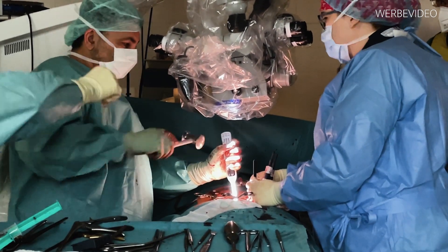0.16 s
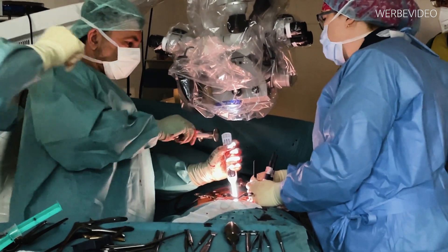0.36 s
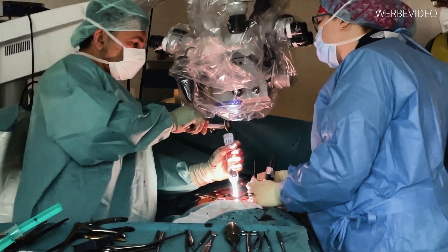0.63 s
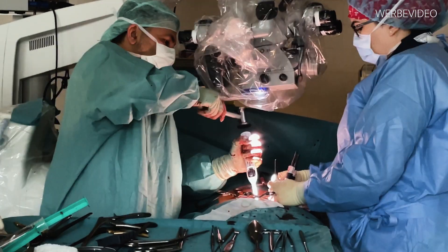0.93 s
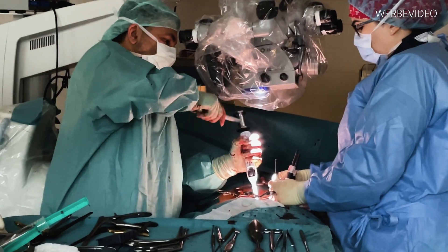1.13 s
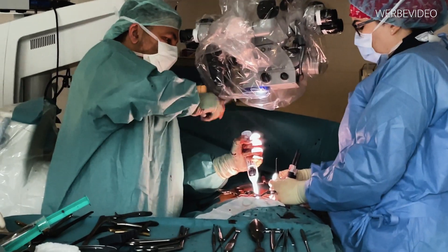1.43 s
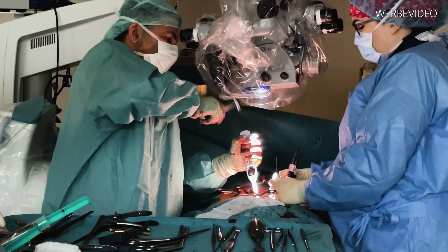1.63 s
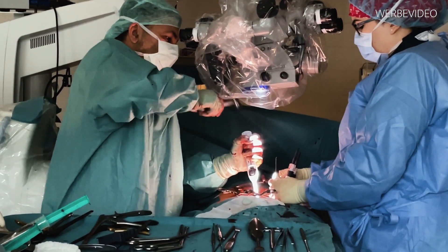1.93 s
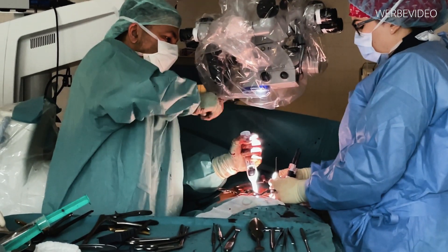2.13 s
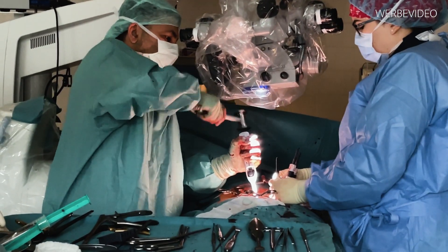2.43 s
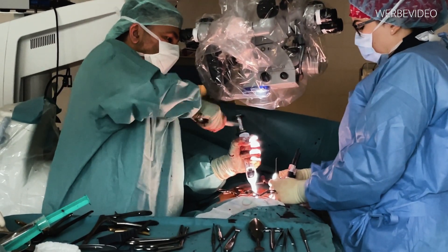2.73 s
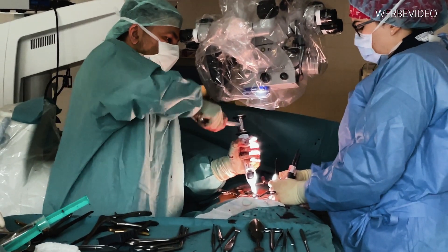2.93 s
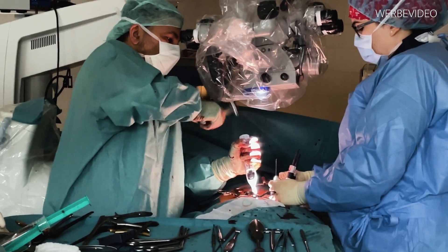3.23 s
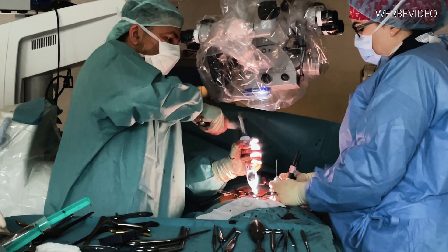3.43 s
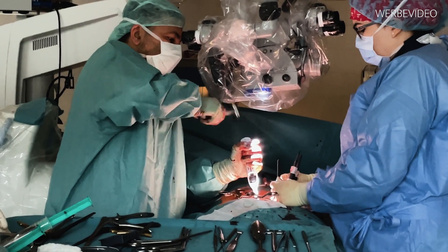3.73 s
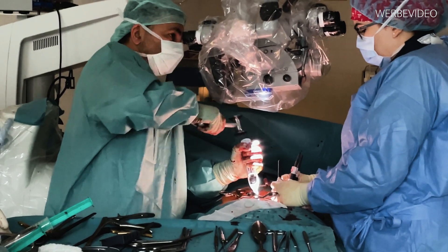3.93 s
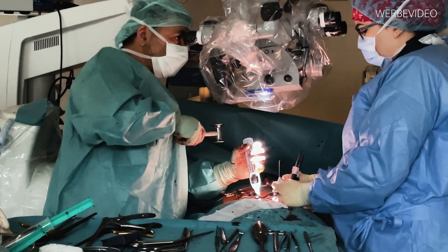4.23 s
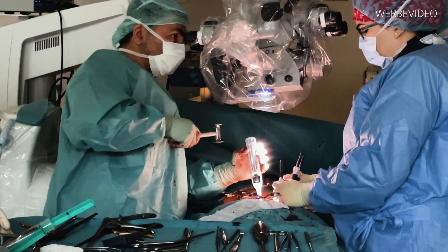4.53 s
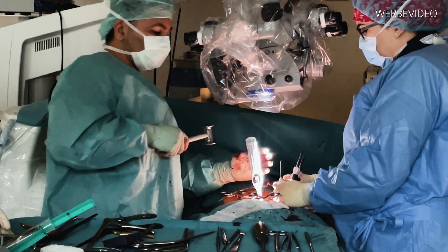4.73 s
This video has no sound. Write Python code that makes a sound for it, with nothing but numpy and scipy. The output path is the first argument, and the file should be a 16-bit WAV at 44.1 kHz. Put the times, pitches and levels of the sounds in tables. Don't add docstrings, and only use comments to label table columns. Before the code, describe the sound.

In a tiled operating room, soft suction hiss lies over low ventilation rumble, with a few tiny tool clicks. The hiss cuts off, and a steel mallet strikes a gripped metal instrument sixteen times in a quick even series. Each blow is a sharp crack with short damped ringing and a faint thud, answered by hard echoes. The microphone is about two metres away; afterwards only ventilation remains.

```python
import sys
import numpy as np
from scipy import signal
from scipy.fft import rfft, irfft
from scipy.io import wavfile
from scipy.ndimage import uniform_filter1d

SR = 44100
rng = np.random.default_rng(int(sys.argv[2]) if len(sys.argv) > 2 else 0)


def boost(x):
    u = np.asarray(x, float) / 20
    return 10 ** u


def int16_out(signal):
    q = np.round(np.clip(np.atleast_2d(signal).T, -1, 1) * 32767)
    wavfile.write(sys.argv[1], SR, q.astype(np.int16))


N = 214673


def shade(x, points):
    hz, db = np.transpose(points)
    f = np.arange(len(x) // 2 + 1) * SR / len(x) + 1
    gain = boost(np.interp(np.log(f), np.log(hz), db))
    return irfft(rfft(x) * gain, len(x))


def level(x, db):
    return x * boost(db) / np.sqrt(np.mean(x ** 2))


def fade(t, t60):
    return np.exp(-np.log(1000) * t / max(t60, 1e-3))


def rings(modes, db=0.):
    t = np.arange(SR // 4) / SR
    total = sum(boost(g) * np.sin(2 * np.pi * hz * t) * fade(t, t60) for hz, g, t60 in modes)
    return boost(db) * total


def add(out, sound, s):
    i = int(s * SR)
    out[i:i + len(sound)] += sound[:N - i]


def walk(rate):
    hold = int(SR / rate)
    steps = np.repeat(rng.standard_normal(N // hold + 1), hold)
    smooth = uniform_filter1d(uniform_filter1d(steps, hold), hold)
    return 0.71 * smooth[:N]


CENTRES_HZ = 30 * 2 ** np.arange(0, 9.5, .5)


def bands(x):
    f = np.arange(len(x) // 2 + 1) * SR / len(x) + 1
    place = 2 * np.log2(f / CENTRES_HZ[0])
    spectrum = rfft(x)
    return [irfft(spectrum * np.clip(1 - abs(place - k), 0, 1), len(x)) for k in range(len(CENTRES_HZ))]


# (time [s], crack peak [dB], landing spot, shaft partials [dB],
# lower head ring [dB], upper head ring [dB])
BLOWS = [(1.128, -3, "rim", -21, -21, -35.5), (1.3101, -6.5, "rim", -28, -18.5, -23),
         (1.4959, -9.5, "low", -23, -19.5, -25), (1.6798, -10, "low", -28, -20.5, -26.5),
         (1.8569, -5, "low", -20.5, -20, -21.5), (2.039, -5.5, "centre", -21.5, -25.5, -25),
         (2.2154, -8, "centre", -21.5, -26.5, -21.5), (2.4023, -6.5, "centre", -28.5, -23.5, -22.5),
         (2.5817, -7, "low", -19, -22, -23.5), (2.7534, -6.5, "centre", -20, -23.5, -21),
         (2.9274, -6, "centre", -23.5, -22.5, -25), (3.1027, -8, "far", -27, -26, -27.5),
         (3.2788, -6.5, "far", -21, -39, -23.5), (3.4587, -7, "side", -25, -32, -22.5),
         (3.6484, -6.5, "side", -21, -43.5, -21.5), (3.8486, -6, "side", -19, -42, -25)]
# (frequency [Hz], level [dB])
CRACK = [(300, -23.5), (600, -27.5), (1500, -13), (2300, -7.5), (2900, -5.5), (3600, -1.5), (5000, -1.5),
         (6500, 1.5), (8000, 0), (10200, -3.5), (12000, 2.5), (13200, -15.5), (15600, -15)]
# (frequency [Hz], level [dB])
BEAM = [(1000, 14.5), (3000, 1), (6300, 2), (8000, 5), (11000, -3.5), (15000, 6.5)]
ROOM_DB, ROOM_FOLLOWS = -5, 0.59
RING_START_HZ, RING_END_HZ, RING_RISE_S = 8770, 9260, 0.36


def head():
    out = np.zeros((3, N))
    t = np.arange(SR // 4) / SR
    habit = rng.standard_normal(len(t))
    burst = (t / .0008) ** 2 / (1 + (t / 0.001) ** 2) * fade(t, 0.0081)
    click = np.roll(shade(1. * (t == 0), CRACK), 60)[:200]
    for s, db, _, _, low_db, up_db in BLOWS:
        age = s - BLOWS[0][0]
        ring_hz = RING_END_HZ - (RING_END_HZ - RING_START_HZ) * np.exp(-age / RING_RISE_S)
        room_db = ROOM_DB + ROOM_FOLLOWS * (db + 5)
        crack = shade(.5 * habit + .85 * rng.standard_normal(len(t)), CRACK)
        crack = shade(crack, BEAM) * burst
        ring = rings([(ring_hz, low_db + 7, .009), (12190, up_db, .03),
                      (12300, up_db + 3, .014), (14150, up_db - 19, .04)])
        aim = 0.72 * rng.standard_normal()
        add(out[0], boost(db) * crack / (32 * crack.std()) + ring, s + .0007)
        add(out[1], boost(room_db - db) * ring, s + .0005)
        add(out[1], boost(room_db + 10.5) * np.cos(aim) * click, s)
        add(out[2], boost(room_db + 12.5) * np.sin(aim) * click, s)
    return out


SEATED_S, SEATING_S = 3.17, .07


def seated(s):
    return 1 / (1 + np.exp((SEATED_S - s) / SEATING_S))


# (frequency [Hz], level [dB], t60 [s])
KNOCK = [(870, -17.5, 0.041), (967, -3.5, 0.022), (928, -3.5, 0.021), (1000.6, -4, 0.04),
         (1040, -2.5, 0.011), (1776, -5, 0.036)]
# (frequency [Hz], level [dB], t60 [s])
THUD = [(174.5, 1, 0.12), (320, -12.5, 0.018), (500, -10.5, 0.012)]
# (clack [Hz], clack [dB], partial [Hz], second partial [Hz],
# second partial against the first [dB])
SPOTS = dict(rim=(1860, -25.5, 2200, 4100, -3), side=(1760, -24, 2485, 4500, -5),
         low=(1340, -24.5, 2475, 4570, -2), centre=(1440, -19.5, 2795, 3250, -4),
         far=(1850, -27.5, 2170, 3170, -1))
KNOCK_DB, KNOCK_SAG_DB_PER_S = -23, -2.5
THUD_DB, THUD_CHOKE_DB = -36, -9
CLACK_ROOM_DB = -10.5
PARTIAL_T60_S, GRIP_DETUNE, GRIP_DB = .011, .008, 1.5


def shaft():
    out = np.zeros((2, N))
    grips = rng.standard_normal((len(BLOWS), 2, len(KNOCK)))
    for (s, _, spot, up_db, *_), (detune, weight) in zip(BLOWS, grips):
        clack_hz, clack_db, hz, hz2, db2 = SPOTS[spot]
        knock_db = KNOCK_DB + KNOCK_SAG_DB_PER_S * (s - BLOWS[0][0])
        held = [(f * (1 + GRIP_DETUNE * a), g + GRIP_DB * b, d)
                for (f, g, d), a, b in zip(KNOCK, detune, weight)]
        knock = rings(held, knock_db - 7)
        partials = rings([(hz, 0, PARTIAL_T60_S), (hz2, db2, PARTIAL_T60_S)], up_db - 6)
        clack = rings([(clack_hz, clack_db, .012)])
        thud = rings(THUD, THUD_DB + THUD_CHOKE_DB * seated(s))
        for way, clack_gain in zip(out, (1, boost(CLACK_ROOM_DB))):
            add(way, knock + partials + clack_gain * clack, s + .0012)
            add(way, thud, s + 0.0028)
    return out


# (time [s], level [dB], frequency [Hz], t60 [s])
CLICKS = [
    (0.284, -48, 3450, 0.012),
    (0.312, -47, 3250, 0.012),
    (.403, -43, 3300, 0.0073),
    (0.4174, -35.5, 1710, 0.0057),
    (0.4182, -28.5, 2070, 0.008),
    (0.4207, -47, 5800, 0.0055),
    (0.977, -57.5, 3300, 0.023),
    (4.335, -54, 3400, 0.015),
    (4.655, -60, 3300, .02),
]


def tools():
    out = np.zeros(N)
    for s, db, hz, t60 in CLICKS:
        add(out, rings([(hz, db, t60)]), s)
    return out


# (delay [ms], level [dB], dullness [0-1])
ECHOES = [(2.117, -10, 0), (4.49, -13, 0), (7.51, -6, 0.2), (18.07, -9.5, 0.2), (23.77, -13, 0.8),
          (37.8, -9, 1)]


def echoes():
    response = np.zeros(SR // 10)
    response[0] = 1
    for ms, db, dull in ECHOES:
        dull = np.clip(dull, 0, .95)
        add(response, boost(db) * (1 - dull) * dull ** np.arange(200), ms / 1000)
    return response


# (frequency [Hz], t60 [s], level [dB])
TAIL = [(120, 0.82, -13.5), (301.4, 0.6, -15), (602, 0.86, -16), (990, 0.57, -10), (2130, 0.61, -9),
        (3900, 0.54, -11.5), (7900, 0.42, -11), (12530, 0.23, -8.5), (13600, 0.27, -14), (15500, 0.26, -13)]


def room():
    t = np.arange(SR) / SR
    hz, t60, db = np.transpose(TAIL)
    t60 = np.interp(np.log(CENTRES_HZ), np.log(hz), t60)
    db = np.interp(np.log(CENTRES_HZ), np.log(hz), db)
    parts = bands(rng.standard_normal(SR))
    tail = sum(boost(g - 15.0) * part * fade(t, d) for part, d, g in zip(parts, t60, db))
    return tail * (1 - np.exp(-(t / 0.0091) ** 2))


# (frequency [Hz], level [dB per Hz])
AIR = [(30, -39), (60, -4), (100, -2), (160, -4.5), (256, -15), (405, -18), (575, -24.5), (720, -17.5),
       (990, -27), (1900, -31.5), (3400, -36.5), (4500, -38.5), (12500, -47), (14500, -62)]
# (frequency [Hz], level [dB per Hz])
HISS = [(600, 10), (1500, -3.5), (3300, -2.5), (5000, -12), (7800, -9.5), (10000, -13.5), (12500, -13),
        (15000, -22)]
AIR_DB = -49
SUCTION_DB, SUCTION_SWELL_DB, SUCTION_SWELL_S, SUCTION_SWELL_WIDTH_S = -58, 2, 0.49, 0.21
SUCTION_STOPS_S, SUCTION_RELEASE_S = .752, .012


def air():
    t = np.arange(N) / SR
    vents = sum(part * boost(.8 * walk(6)) for part in bands(shade(rng.standard_normal(N), AIR)))
    swell_db = SUCTION_SWELL_DB * np.exp(-((t - SUCTION_SWELL_S) / SUCTION_SWELL_WIDTH_S) ** 2)
    valve = np.clip(1 - (t - SUCTION_STOPS_S) / SUCTION_RELEASE_S, 0, 1)
    hiss = level(shade(rng.standard_normal(N), HISS), 2.2)
    return level(vents, AIR_DB) + boost(SUCTION_DB + swell_db) * valve * hiss


def scene():
    front, side, other_side = head()
    body, clicks = shaft(), tools()
    paths = [(front + body[0] + clicks, echoes()),
             (side + body[1] + boost(-7.5) * clicks, room()),
             (other_side, room())]
    heard = sum(signal.fftconvolve(x, h)[:N] for x, h in paths)
    return (heard + air())[None]


STRICT_S, STRICT_WIDTH_S, STRICT_DB = 2.35, 0.64, 10


def mask_top(x, gap_db=26, whim_db=2.5):
    f, s, cells = signal.stft(x, SR, nperseg=1024)
    ring = np.mean(abs(cells[(f > 11500) & (f < 12800)]) ** 2, axis=0)
    whim = whim_db * walk(8)[np.minimum((s * SR).astype(int), N - 1)]
    strict = STRICT_DB * np.exp(-((s - STRICT_S) / STRICT_WIDTH_S) ** 4)
    limit = ring * boost(whim - gap_db + strict) ** 2
    for lo in range(13000, 16600, 600):
        band = (f >= lo) & (f < lo + 600)
        cells[band] *= np.mean(abs(cells[band]) ** 2, axis=0) > limit
    return signal.istft(cells, SR, nperseg=1024)[1][:N]


def top_cut(x):
    return signal.sosfilt(signal.butter(12, 16970, fs=SR, output="sos"), x)


LOW_HZ, TOP_HZ = 82.5, 15800
PRE_RING_HZ, PRE_RING_WIDTH_HZ = 7500, 200


def record(dry):
    x = signal.sosfilt(signal.butter(4, LOW_HZ, "high", fs=SR, output="sos"), dry)
    r = np.exp(-np.pi * PRE_RING_WIDTH_HZ / SR)
    poles = [1, -2 * r * np.cos(2 * np.pi * PRE_RING_HZ / SR), r * r]
    x = signal.lfilter(poles[::-1], poles, x[:, ::-1])[:, ::-1]
    x = signal.sosfilt(signal.ellip(5, .2, 22, TOP_HZ, fs=SR, output="sos"), x)
    mix = mask_top(x[0])[None]
    return top_cut(mix)


dry = scene()
out = record(dry)
int16_out(out)
```